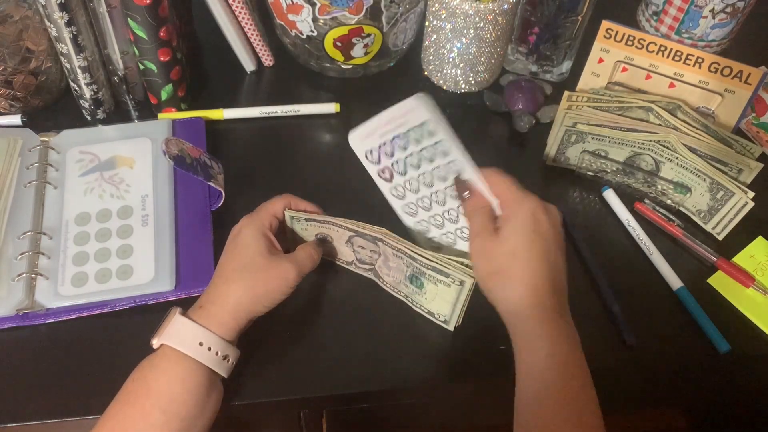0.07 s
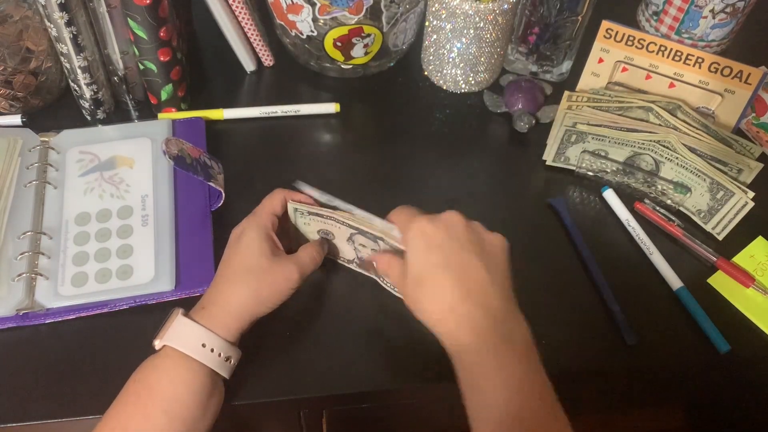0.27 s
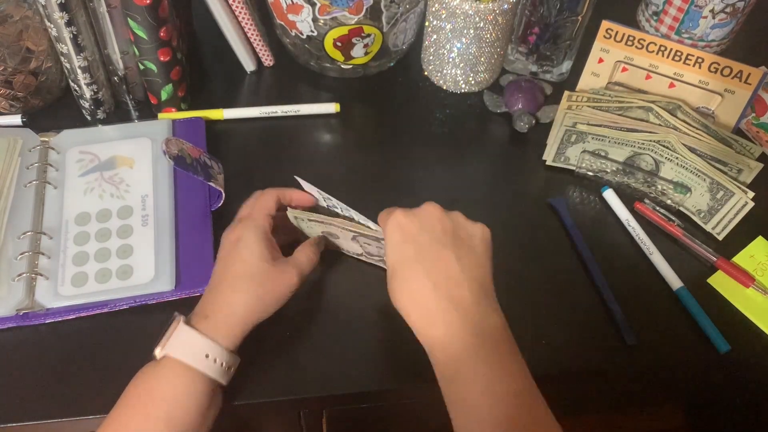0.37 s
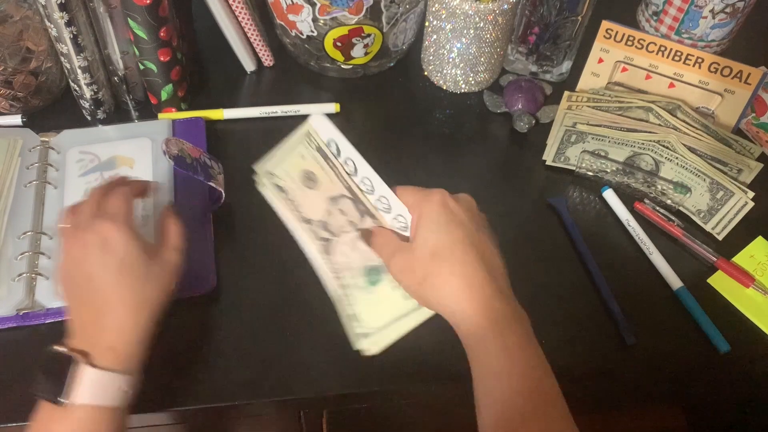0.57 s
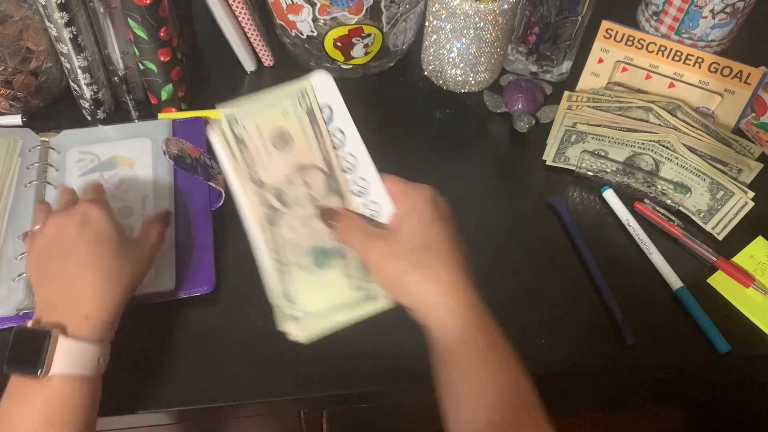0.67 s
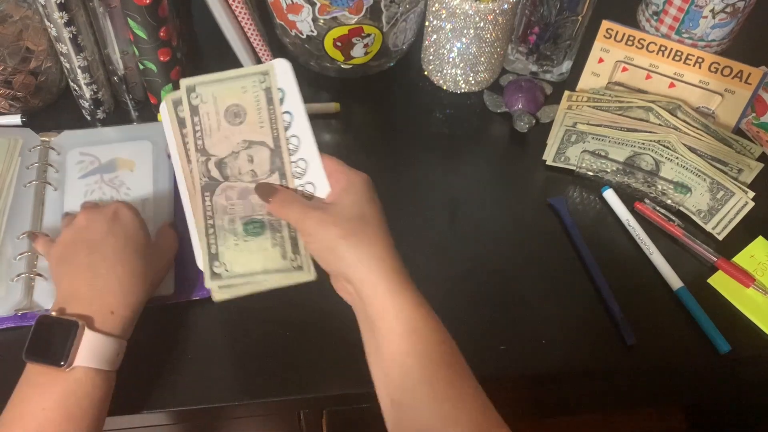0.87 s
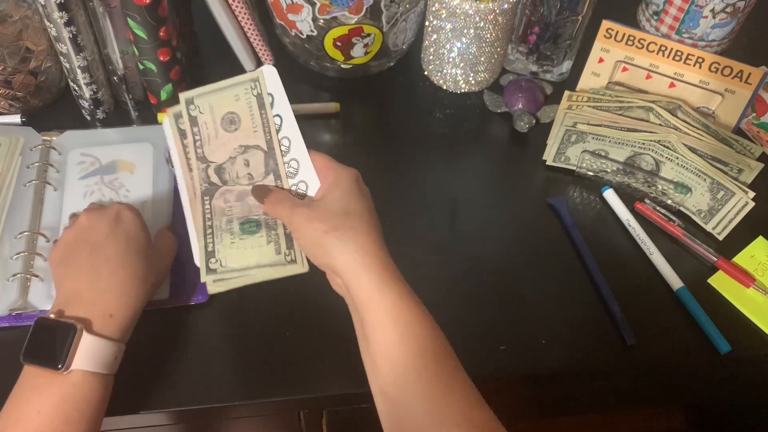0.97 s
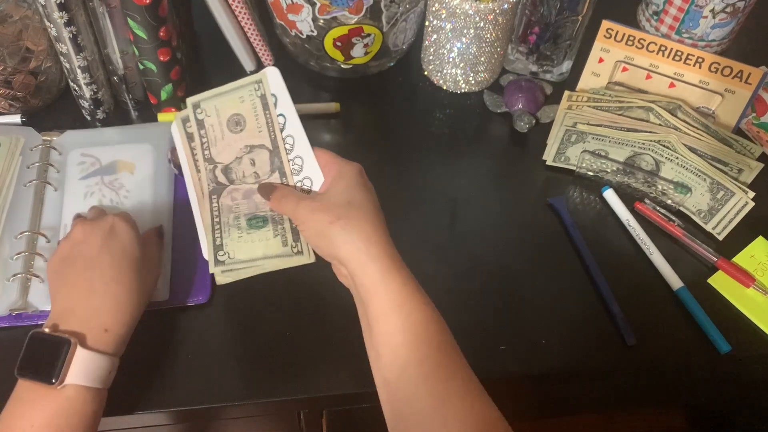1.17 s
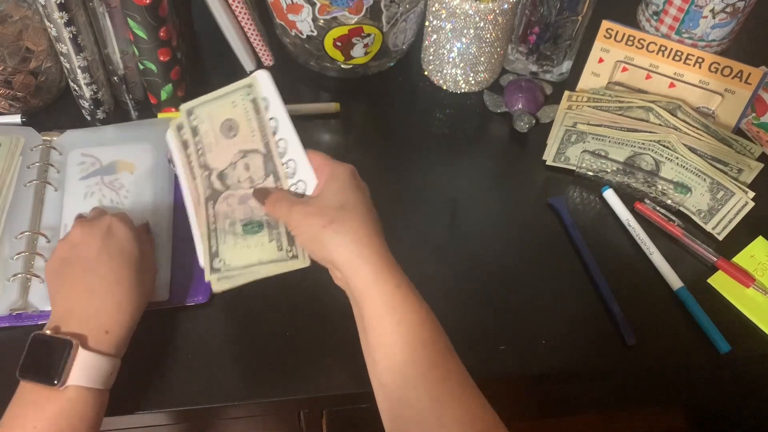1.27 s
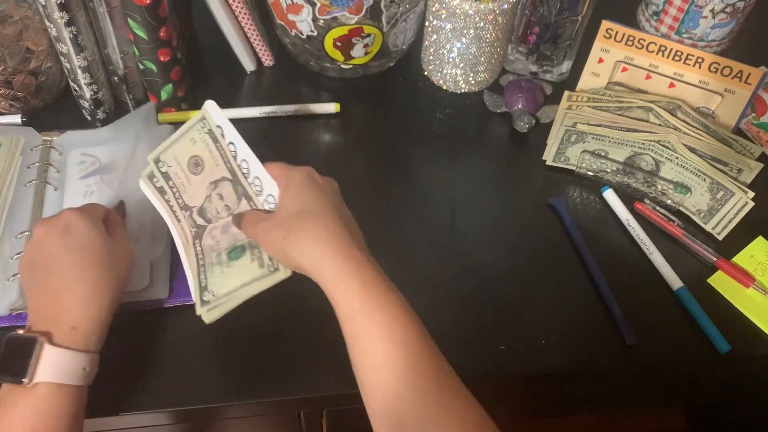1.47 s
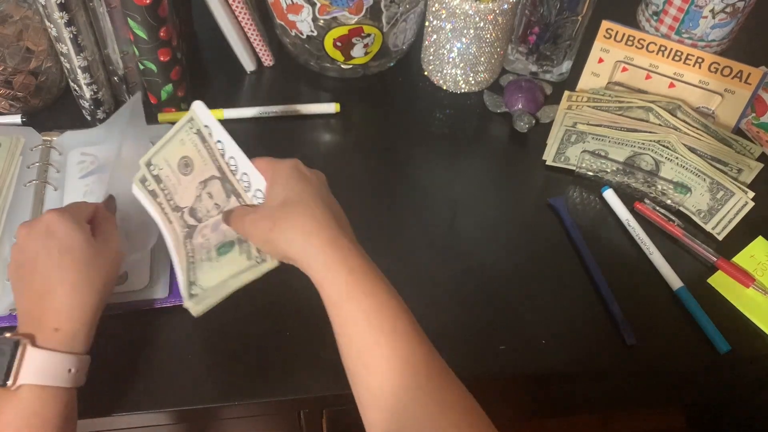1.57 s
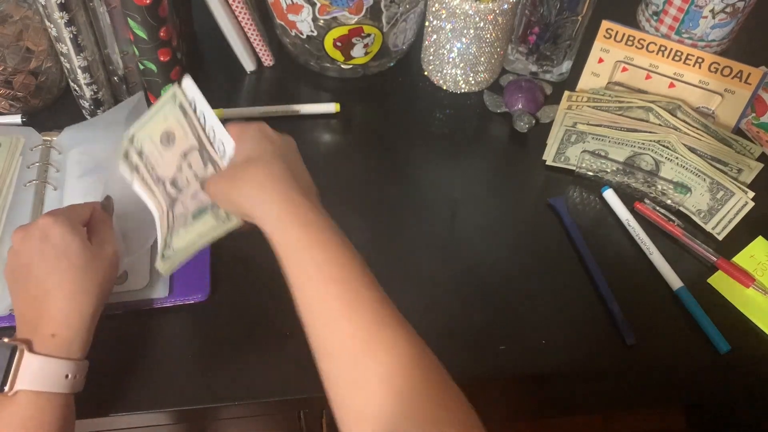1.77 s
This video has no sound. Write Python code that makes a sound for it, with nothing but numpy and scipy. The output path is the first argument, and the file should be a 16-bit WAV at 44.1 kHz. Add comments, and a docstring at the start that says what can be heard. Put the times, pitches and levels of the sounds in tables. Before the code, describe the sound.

A stiff card knocks sharply on a desk, then paper banknotes rustle, crinkle and flick softly

```python
"""Card and banknotes on a desk

Close stereo microphone above a desk in a small room. A stiff card is knocked down: clicks and damped modes. It
is gathered with a few banknotes, which slide (shaped friction noise), crinkle and flick (noise bursts). Soft
bumps travel through the desk, and a plastic binder pocket rings once under a faint pat. Behind it all: scatter
off the things on the desk, a short room tail, a low rumble and two hum tones."""
import sys
import numpy as np
from scipy import signal
from scipy.fft import rfft, irfft, next_fast_len
from scipy.io import wavfile
from scipy.ndimage import map_coordinates

SR = 44100
rng = np.random.default_rng(int(sys.argv[2]) if len(sys.argv) > 2 else 0)


def transcribe(signal):
    """Save signal, clipped to [-1, 1], as a 16-bit WAV file at the path in sys.argv[1]."""
    frames = np.atleast_2d(signal).T
    limited = np.clip(frames, -1, 1)
    pcm = np.round(limited * 32767).astype(np.int16)
    wavfile.write(sys.argv[1], SR, pcm)


N = 79380  # length in samples, 1.8 s
NOISE_SIDE = 0.97  # opposed part relative to shared part in contact noise; 0 would be mono


# Card edge meeting the desk: (time [s], ring level [dB], click level relative to the ring [dB]).
TAPS = [(0.1644, -21, -6.5), (0.1794, -20, -8), (0.1866, -30.5, -15.5), (0.2039, -3, 5.5),
        (.2122, -18.5, -3), (0.2188, -13.5, -6), (0.2203, -13, -12.5), (0.2658, -28.5, -15),
        (.3238, -22.5, 4)]
# What card and desk ring with: (frequency [Hz], level [dB], T60 [s]).
CARD_MODES = [(240.2, -31, .06), (370, -29.5, .04), (466, -25.5, 0.049), (689.5, -13.5, 0.026),
              (959, -11, 0.022), (1130, -18, .03), (1379, -13, 0.025), (1865, -8.5, 0.014),
              (2230, -10.5, 0.021), (2606, -7.5, .014), (3413, -13.5, 0.029), (3880, -17.5, 0.007)]
# Spectrum of the click: (frequency [Hz], level [dB]).
CLICK_COLOUR = [(100, -11), (600, -5), (2500, 1), (4500, 5), (6600, -10.5), (7300, -8.5), (8000, 0),
                (10500, -7), (13000, -12), (16000, -41)]
CLICK_LIFT_DB, CLICK_PAN_DB = 1.5, -2.5  # lift of every click; negative pan is to the right
CLICK_LEAD_S, CLICK_DECAY_S = 0.00013, 0.0031  # the click comes just before the ring


def card_taps():
    """Each contact gives a bright noise click and a short, woody ring."""
    knock, click = 0, 0
    for start, ring_db, click_db in TAPS:
        knock = knock + undb(ring_db) * ring(start, CARD_MODES)
        click_gain = undb(ring_db + click_db + CLICK_LIFT_DB)
        click = click + click_gain * burst(start - CLICK_LEAD_S, CLICK_DECAY_S)
    return knock + colour(click, CLICK_COLOUR) * pan(CLICK_PAN_DB)


RING_PAN_DB, RING_LAG_S = 3, 0.00008  # left louder, and later
DETUNE = 0.034  # spread of each mode's frequency from strike to strike, as a fraction


def ring(start, modes):
    """Damped modes of alternating sign, reaching the left port a little later and louder."""
    out = np.zeros((2, N))
    near = np.arange(int(start * SR), int(start * SR) + SR // 8)
    lag = np.array([[RING_LAG_S], [0]])
    age = np.maximum(near / SR - start - lag, 0)
    for k, (hz, db, t60) in enumerate(modes):
        turn = 2 * np.pi * hz * (1 + DETUNE * rng.standard_normal())
        fade = np.exp(-np.log(1000) * age / t60)
        out[:, near] += (-1) ** k * undb(db) * np.sin(turn * age) * fade
    return out * pan(RING_PAN_DB)


# Paper sliding on paper or plastic:
# (start [s], attack [s], hold [s], release [s], body level [dB], hiss level [dB]).
SLIDES = [(.0, 0.0043, 0.0067, 0.027, -59, -70), (0.092, 0.031, 0.017, 0.025, -95, -69.5),
          (0.152, 0.013, 0.063, 0.06, -50.5, -68), (0.221, 0.022, .04, 0.036, -39, -57),
          (0.281, 0.0404, 0.0049, 0.027, -42.5, -48.5), (0.339, .02, 0.045, 0.053, -55, -60.5),
          (0.401, 0.014, 0.012, 0.01, -47.5, -48), (0.466, 0.082, 0.069, 0.076, -72, -71.5),
          (0.642, 0.0089, 0.055, 0.067, -64.5, -75), (0.735, 0.02, 0.016, 0.31, -70, -63),
          (0.832, 0.086, 0.016, 0.017, -56.5, -71.5), (0.924, 0.0098, 0.016, .035, -72, -57.5),
          (1.108, 0.048, 0.032, 0.1, -70.5, -57.5), (1.311, 0.0099, 0.0064, 0.12, -56, -56),
          (1.33, 0.017, 0.088, 0.024, -63, -61), (1.57, 0.0062, 0.015, 0.19, -67, -61),
          (1.598, 0.054, .006, 0.053, -56.5, -60), (1.663, 0.038, .1, .05, -68.5, -62),
          (1.708, 0.072, 0.011, 0.045, -91, -51)]
# Paper buckling: (time [s], body level [dB], crisp level [dB], decay [s]).
CRINKLES = [(.023, -38.5, -46, 0.0023), (.329, -15.5, -22, 0.0042), (0.4175, -14, -32, 0.0017),
            (0.649, -25.5, -33.5, 0.0065), (.697, -39, -62, 0.0021), (0.9244, -25, -28, 0.0032),
            (1.023, -46, -63.5, .002), (1.1417, -53, -35.5, 0.00093), (1.322, -38.5, -27, 0.0044),
            (1.343, -44, -32, 0.0032), (1.397, -33, -39, 0.0016), (1.53, -45, -42, .004),
            (1.576, -45.5, -37, 0.005), (1.623, -30.5, -43, .003)]
# Spectra of the sheets' dull body and of their crisp surface: (frequency [Hz], level [dB]).
BODY_COLOUR = [(60, -11), (200, 2), (400, 7), (620, -0.5), (950, 1), (1400, -1), (2000, 0.5), (2650, -2),
               (4000, -2), (6000, -14), (16000, -27.5)]
HISS_COLOUR = [(200, -28), (1350, -16.5), (1850, -3.5), (2900, -4), (4200, 1), (6500, 3), (8500, -3),
               (10500, 0), (13500, -6.5), (16000, -12)]
BODY_PAN_DB, HISS_PAN_DB = 4, -1.3  # body to the left, hiss slightly to the right


def banknotes():
    """Slides and crinkles drive the dull body of the sheets and their crisp surface; a corner flicks."""
    t = np.arange(N) / SR
    body_power, hiss_power = 0, 0
    for start, attack, hold, release, body_db, hiss_db in SLIDES:
        rise = np.clip((t - start) / attack, 0, 1)
        fall = np.exp(-2 * np.maximum(t - start - attack - hold, 0) / release)
        speed = rise * fall
        body_power = body_power + (speed * undb(body_db)) ** 2
        hiss_power = hiss_power + (speed * undb(hiss_db)) ** 2
    body = np.sqrt(body_power) * friction()
    hiss = np.sqrt(hiss_power) * friction()
    for start, body_db, crisp_db, decay in CRINKLES:
        snap = burst(start, decay)  # the same snap drives both parts
        body = body + undb(body_db) * snap
        hiss = hiss + undb(crisp_db) * snap
    dull = colour(body, BODY_COLOUR) * pan(BODY_PAN_DB)
    crisp = colour(hiss, HISS_COLOUR) * pan(HISS_PAN_DB)
    return dull + crisp + flicks()


GRAINS_PER_S, GRAIN_SPREAD_DB = 4700, 1.5  # slips per second in each channel; spread of their size
SMOOTH_SHARE = 0.65  # smooth rub relative to slips
GRIP_DB, GRIP_PER_S = 2.12, 60  # depth and rate of the uneven grip


def friction():
    """Fibres catching and slipping: dense tiny clicks over a smooth rub, with uneven grip."""
    happens = rng.random((2, N)) < GRAINS_PER_S / SR
    slips = happens * rng.standard_normal((2, N))
    extra_db = GRAIN_SPREAD_DB * np.minimum(rng.exponential(size=(2, N)), 4)
    slips = unit(slips * undb(extra_db))
    rub = unit(slips + SMOOTH_SHARE * rng.standard_normal((2, N)))
    return stereo(*rub, NOISE_SIDE) * undb(GRIP_DB * walk(GRIP_PER_S))


# A note's corner flicking free: (time [s], level [dB]).
FLICKS = [(0.9258, -18), (0.9325, -7.5)]
# Spectrum of the flicks: (frequency [Hz], level [dB]).
FLICK_COLOUR = [(500, -24), (3000, -19), (7000, -9), (10500, 5), (14000, 2.5), (16500, -2)]


def flicks():
    """A released paper corner gives a sharp tick: a 1 ms decay of mostly high treble."""
    ticks = sum(undb(db) * burst(start, 0.001) for start, db in FLICKS)
    return colour(ticks, FLICK_COLOUR)


# Fingers, card and binder bumping softly on the desk: (time [s], level [dB], decay [s]).
BUMPS = [(.165, -14.5, .012), (0.207, -10.5, 0.035), (0.42, -26, 0.015), (0.921, -15, 0.026),
         (1.324, -26.5, 0.017), (1.345, -27.5, 0.0058), (1.625, -25, 0.06)]
# Spectrum of the bumps: (frequency [Hz], level [dB]).
BUMP_COLOUR = [(25, -13.5), (55, 3), (110, 4), (280, -1), (550, -9), (950, -10.5), (1500, -20), (2500, -26),
               (6000, -42.5)]


def bumps():
    """Dull, soft contacts that travel through the desk: one noise in both ports, louder on the left."""
    thuds = sum(undb(db) * burst(start, decay) for start, db, decay in BUMPS)
    return colour(thuds, BUMP_COLOUR)[0] * pan(2)


# What the plastic binder pocket rings with: (frequency [Hz], level [dB], T60 [s]).
BINDER_MODES = [(347.6, -6.5, 0.097), (426.7, -11, .13), (1330, -15, 0.031), (2900, -14, 0.069),
                (4600, -5, 0.039)]
PAT_S, PAT_DB = 0.6505, -41  # time and level of the pat


def binder_pat():
    """One faint pat sets off the damped modes of the plastic pocket."""
    return undb(PAT_DB) * ring(PAT_S, BINDER_MODES)


# Spectrum of the room's tail: (frequency [Hz], level [dB]).
ROOM_COLOUR = [(100, -5.5), (450, -3), (850, -0.5), (1500, 4), (2300, 3), (4000, 3.5), (8000, 1),
               (15000, -11)]
# Decay of the small room: (frequency [Hz], T60 [s]).
ROOM_T60 = [(150, 0.33), (600, .33), (2000, 0.25), (6000, 0.17), (15000, .3)]
ROOM_DB, ROOM_ONSET_S = -7.5, 0.0027  # tail level and build-up time
CLUTTER_DB, CLUTTER_START_S, CLUTTER_DECAY_S = -11.5, 0.0014, 0.0067


def room(x):
    """Quick scatter from the things on the desk, and the tail of the room, added to the direct sound."""
    t = np.arange(N) / SR
    hz, age, cells = signal.stft(rng.standard_normal((2, N)), SR, nperseg=256)
    fade = np.exp(-np.log(1000) * age / along(ROOM_T60, hz)[:, None])
    tail = signal.istft(cells * fade, SR)[1][:, :N]
    tail = tail * np.minimum(t / ROOM_ONSET_S, 1)
    tail = colour(unit(tail) / np.sqrt(N), ROOM_COLOUR, keep_power=False)
    clutter = burst(CLUTTER_START_S, CLUTTER_DECAY_S)
    echoes = undb(ROOM_DB) * tail + undb(CLUTTER_DB) * clutter
    return x + signal.fftconvolve(x, echoes, axes=1)[:, :N]


# Spectrum of the ventilation rumble: (frequency [Hz], level [dB]).
RUMBLE = [(20, -27), (32, -20), (45, -1.5), (58, 1), (80, -4.5), (125, -2.5), (200, -15), (300, -18),
          (450, -25), (700, -35), (1000, -48), (2000, -44.5), (4000, -51), (10000, -49.5), (16000, -58)]
# Hum tones: (frequency [Hz], mean level [dB]).
HUM = [(58, -57.5), (168, -58.5)]
RUMBLE_DB, RUMBLE_SIDE = -53, 0.22  # level; opposed part relative to shared part in the bass
AIR_SIDE_HZ = 1000  # the opposed part is stronger above this


def room_tone():
    """Low ventilation rumble and gently wavering hum; the faint treble is wider than the bass."""
    t = np.arange(N) / SR
    mid, side = colour(rng.standard_normal((2, N)), RUMBLE)
    highpass = signal.butter(1, AIR_SIDE_HZ, "high", fs=SR, output="sos")
    air = signal.sosfilt(highpass, side)
    wide_side = side + air * (1 / RUMBLE_SIDE - 1)
    hum = 0
    for hz, db in HUM:
        gain = np.sqrt(2) * undb(db + 0.5 * walk(12))
        phase = 2 * np.pi * hz * t + 0.18 * walk(2.4)
        hum = hum + gain * np.sin(phase)
    return undb(RUMBLE_DB) * stereo(mid, wide_side, RUMBLE_SIDE) + hum


def burst(start, decay):
    """A dying puff of noise with unit energy in each channel."""
    age = np.arange(N) / SR - start
    noise = stereo(*rng.standard_normal((2, N)), NOISE_SIDE)
    x = noise * (age >= 0) * np.exp(-np.abs(age) / decay)
    return x / np.sqrt(np.sum(x ** 2, axis=1, keepdims=True))


def walk(rate):
    """Random wander, joining normal draws with straight lines at the given rate per second."""
    return np.interp(np.arange(N) / SR * rate, np.arange(N), rng.standard_normal(N))


def undb(db):
    """Decibels to gain."""
    return 10 ** (np.asarray(db) / 20)


def unit(x):
    """Scale to rms 1."""
    return x / np.sqrt(np.mean(x ** 2))


def along(points, hz):
    """Read a table on a log-frequency axis."""
    f, value = np.array(points, float).T
    return np.interp(np.log(np.maximum(hz, 1)), np.log(f), value)


def colour(x, points, keep_power=True):
    """Causal minimum-phase filter of the given spectrum; keep_power sets its rms gain to 1."""
    size = next_fast_len(2 * N)
    size += size % 2
    gain = undb(along(points, np.arange(size // 2 + 1) * SR / size))
    cepstrum = irfft(np.log(unit(gain) if keep_power else gain))
    cepstrum[1:size // 2] *= 2  # fold the cepstrum forward in time
    cepstrum[size // 2 + 1:] = 0
    return irfft(rfft(x, size) * np.exp(rfft(cepstrum)))[..., :N]


def pan(db):
    """Left and right gains for a level difference; positive is to the left."""
    return undb(np.array([[db], [-db]]) / 2)


def stereo(mid, side, width):
    """Two channels from a shared and an opposed part."""
    return np.array([mid + width * side, mid - width * side]) / np.hypot(1, width)


def scene():
    """Card, notes and binder on the desk, in the room, over its rumble and hum."""
    desk = card_taps() + banknotes() + bumps() + binder_pat()
    return room(desk) + room_tone()


# Microphone pair's response to what its ports share, and to what differs between them:
# (frequency [Hz], gain [dB]).
MID_COLOUR = [(11000, -3), (11850, -18.5), (12600, 0), (13800, -2.5), (15000, -16.5), (15700, -5),
              (16500, -15.5)]
SIDE_COLOUR = [(100, -2.5), (350, -6), (600, -2), (1000, -4.5), (2300, -1), (5000, -4.5), (12000, -2.5),
               (16000, -5.5)]
TOP_HZ = 16400  # upper limit of the microphone


def record(dry):
    """The close pair of ports narrows the bass and spreads the high treble; the top is cut."""
    mid = colour((dry[0] + dry[1]) / 2, MID_COLOUR, keep_power=False)
    hz = np.arange(N + 1) * SR / (2 * N)
    side_spectrum = rfft((dry[0] - dry[1]) / 2, 2 * N)
    side = irfft(side_spectrum * undb(along(SIDE_COLOUR, hz)))[:N]
    lowpass = signal.ellip(8, 0.2, 70, TOP_HZ, fs=SR, output="sos")
    return signal.sosfilt(lowpass, np.array([mid + side, mid - side]))


dry = scene()
out = record(dry)
transcribe(out)
```